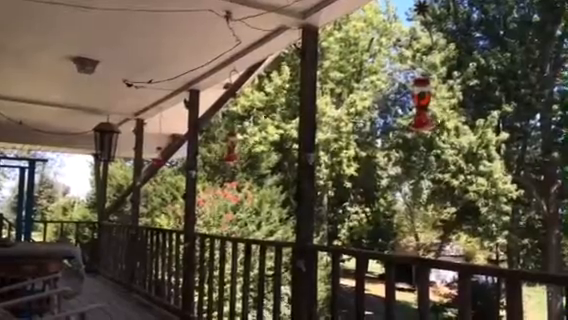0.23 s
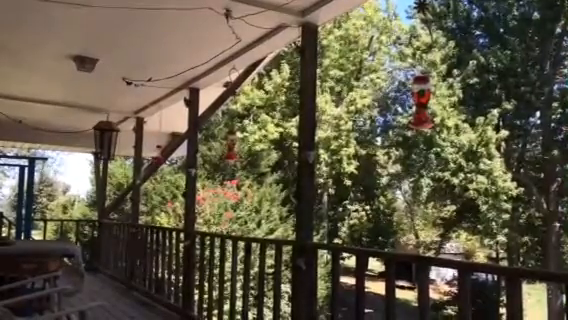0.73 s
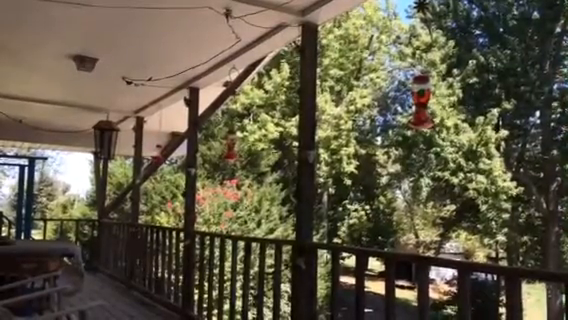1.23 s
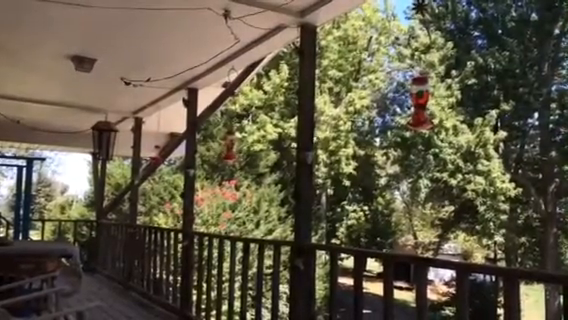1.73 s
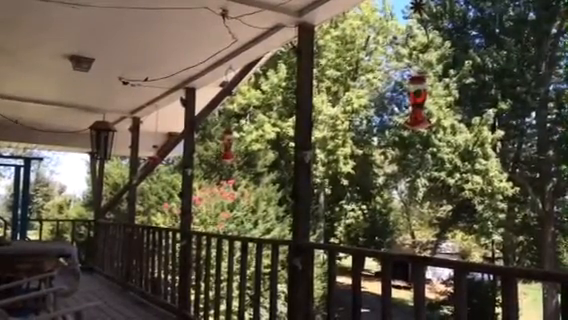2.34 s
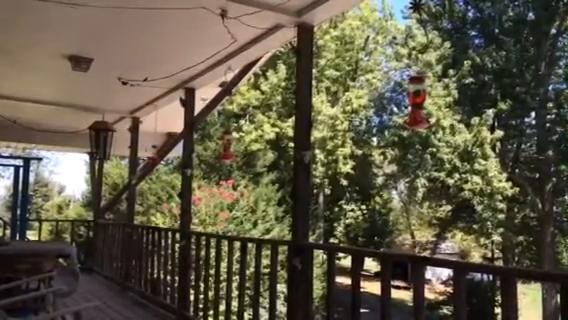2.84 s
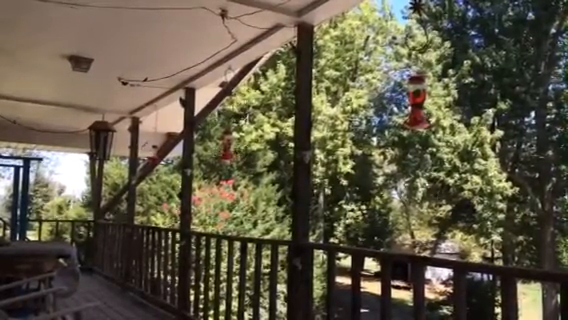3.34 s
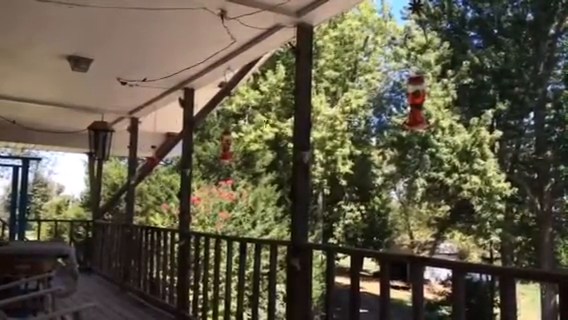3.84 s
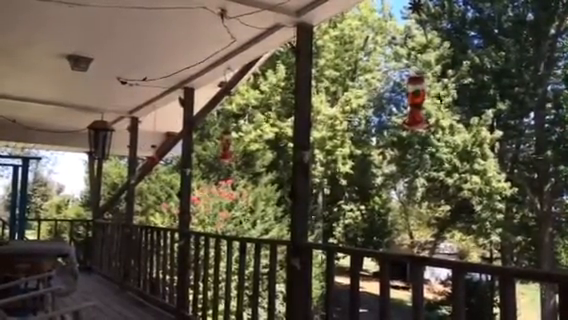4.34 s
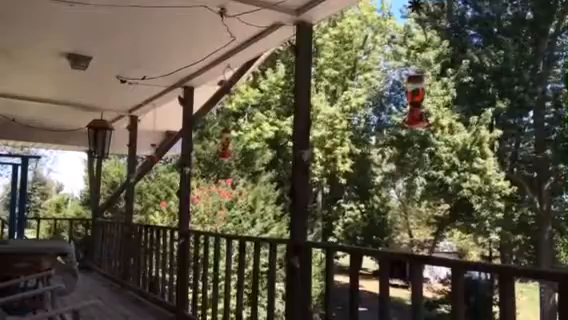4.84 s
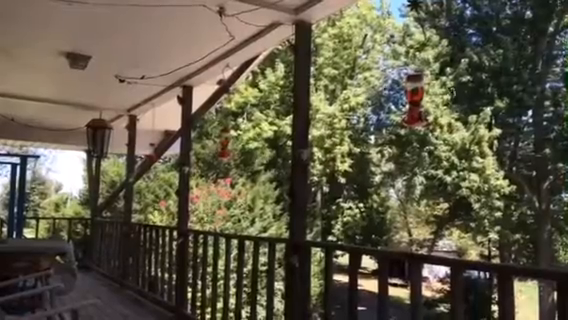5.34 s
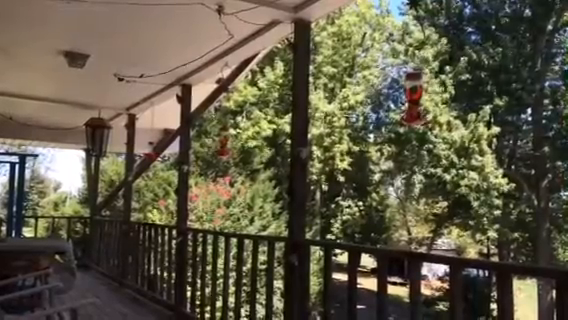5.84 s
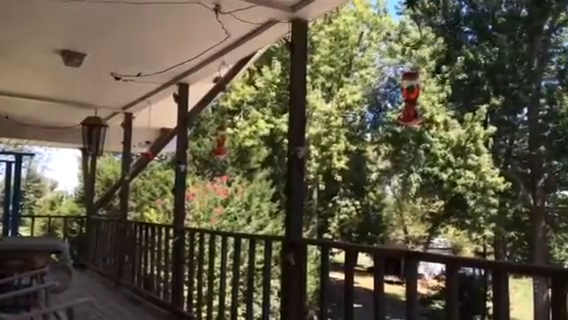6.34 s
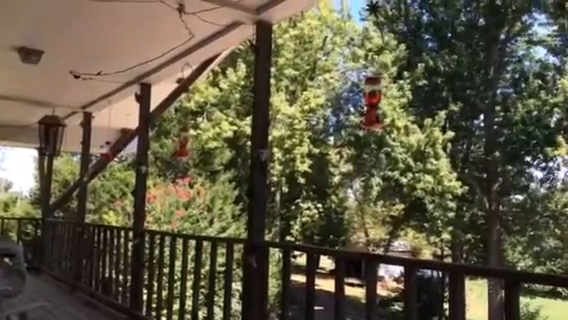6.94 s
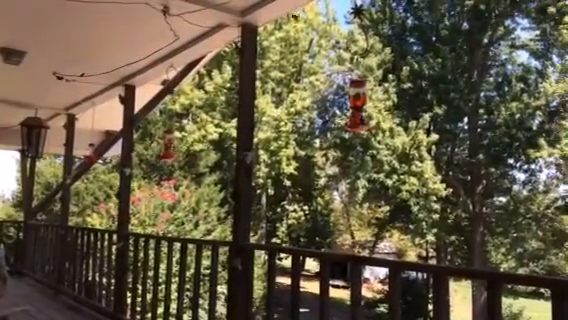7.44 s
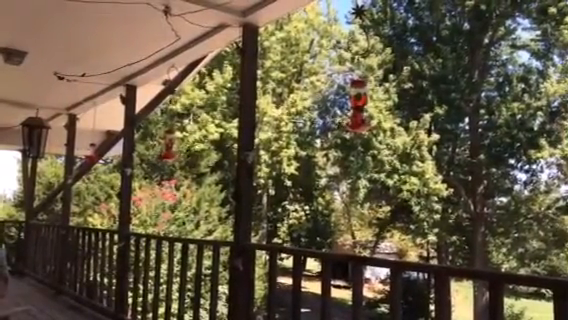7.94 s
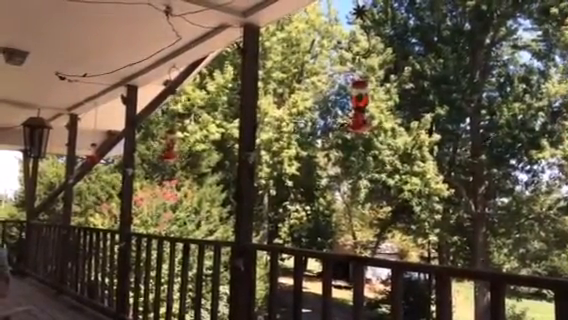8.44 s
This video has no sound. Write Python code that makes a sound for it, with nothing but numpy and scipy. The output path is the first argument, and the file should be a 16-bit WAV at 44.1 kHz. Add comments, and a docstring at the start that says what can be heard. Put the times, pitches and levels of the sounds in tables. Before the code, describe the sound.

Hummingbirds squabble around feeders on a wooden porch. Thin, high squeaks come first, mixed with soft rustles, quick runs of falling chips and short harsh buzzes. After a flurry past the middle comes a lull, then a squeak, several buzzes and a last run of chips. The nearby calls echo briefly under the roof, over a low hum of wings, a distant rumble, garden hiss and faint insects.

```python
"""Hummingbirds squabble round the feeders of a wooden porch, whose roof and deck echo each call.
Thin whistled squeaks open, loudest at 1.7 s, among soft rustles, runs of short falling chips and harsh
buzzes, with a flurry near 5 s. A lull from 5.5 s leaves faint far-off chips; at 7.2 s a squeak is
followed by five buzzes, a last run and a last squeak. Throughout: a low hum of wings, a far rumble,
far chips, the hiss of the garden and a faint high insect band."""
import sys
import numpy as np
from scipy import signal
from scipy.fft import rfft, irfft, next_fast_len
from scipy.io import wavfile

SR = 44100
rng = np.random.default_rng(int(sys.argv[2]) if len(sys.argv) > 2 else 0)


def store_pcm(level_fs):
    """Save levels as 16-bit WAV."""
    pcm = np.round(np.clip(level_fs, -1, 1) * 32767).astype(np.int16)
    wavfile.write(sys.argv[1], SR, np.atleast_2d(pcm).T)


N = 383229

# whistles: (time [s], length [s], first pitch [Hz], middle pitch [Hz], last pitch [Hz], level [dB],
# loudest point [0-1])
SQUEAK_CALLS = [ (.004, 0.11, 6900, 6690, 6960, -40.5, 0.13), (0.176, 0.086, 5470, 5385, 5580, -36.5, 0.37),
                (0.498, 0.079, 6990, 6850, 6800, -33, 0.12), (0.722, 0.084, 5730, 6160, 6290, -51.5, 0.9),
                (1.183, 0.085, 7350, 6800, 6600, -36.5, 0.3), (1.499, 0.17, 6590, 6270, 6580, -54.5, 0.18),
                (1.642, 0.034, 7000, 6990, 7020, -42, 0.7), (1.666, 0.054, 7130, 7154, 7190, -27, 0.25),
                (2.17, 0.077, 5700, 5600, 5830, -63, 0.3), (2.329, 0.1, 6960, 7070, 7000, -51, 0.35),
                (2.94, 0.088, 6400, 6160, 6150, -61, 0.44), (3.224, 0.092, 6780, 7120, 6730, -40, 0.9),
                (3.749, 0.12, 6780, 6730, 6800, -59.5, 0.15), (4.235, 0.1, 6290, 6620, 6730, -58.5, 0),
                (4.742, 0.083, 6340, 6330, 6600, -34.5, 0.12), (4.897, 0.066, 6400, 6510, 6250, -38, 0.45),
                (4.955, 0.11, 5540, 5800, 5720, -46.5, 0.3), (6.714, 0.054, 7460, 7230, 7180, -51.5, 0.4),
                (7.215, 0.067, 6000, 5400, 6020, -38.5, 0.5), (8.183, 0.12, 7290, 7250, 7200, -53.5, 0.15)]
# second harmonic of a squeak: (pitch [Hz], level re fundamental [dB])
SQUEAK_OCTAVE = [(5400, 0), (6350, -6), (6800, -13.5), (7200, -15.5)]
def squeaks(flutter_db=4.5):
    """Whistles bending through three pitches; low ones have a strong octave, soft ones waver more."""
    out, wobble, flutter = np.zeros((2, N)), walk(900), walk(130)
    for start_s, length_s, first_hz, middle_hz, last_hz, db, peak in SQUEAK_CALLS:
        u, at = span(start_s, length_s)
        knee_hz = middle_hz + .27 * (first_hz - middle_hz)
        hz = np.interp(u, [0, .2, .45, .85, 1], [first_hz, knee_hz, middle_hz, last_hz, last_hz])
        waver = np.interp(db, [-56, -44], [.022, .007])
        note = voice(hz * (1 + waver * wobble[at]), [0, lookup(middle_hz, SQUEAK_OCTAVE)])
        flutter_gain = undb(flutter_db * np.tanh(flutter[at]))
        add(out, start_s, note * swell(u, peak, power=.65) * flutter_gain, db)
    return out


# harsh calls: (time [s], length [s], top pitch [Hz], last dip [Hz], level [dB], overtone boost [dB])
BUZZ_CALLS = [ (0.315, 0.079, 5210, 1602, -46.5, 0), (2.35, 0.048, 2710, 1985, -59, 1),
              (3.376, 0.076, 6830, 5150, -53.5, -1), (3.599, 0.051, 3794, 2270, -57, 3),
              (4.054, 0.052, 6500, 4470, -52, 1.5), (4.904, 0.083, 6710, 2298, -47, 8),
              (5.087, 0.048, 3506, 1954, -49, 1), (7.274, 0.08, 5810, 1706, -50, 2.5),
              (7.436, 0.04, 3585, 1670, -49, -5), (7.528, 0.051, 3814, 1717, -47, -2.5),
              (7.622, 0.049, 3700, 1930, -50, -4), (7.695, 0.074, 5300, 2200, -49, 3.5)]
def buzzes(trill_hz=80, droop=.35, first_depth=.26):
    """The pitch plunges and recovers, deeper each time and roughest in the dips; a low chip ends it."""
    out, jitter, stumble = np.zeros((2, N)), walk(3500), walk(150)
    for start_s, length_s, top_hz, last_dip_hz, db, bright_db in BUZZ_CALLS:
        u, at = span(start_s, length_s)
        trill_rad = np.pi * trill_hz * u * length_s + .28 * stumble[at]
        plunge = (1 - np.abs(np.cos(trill_rad))) ** .6
        crest_hz = top_hz * (1 - droop * u ** 5)
        first_dip_hz = top_hz * (last_dip_hz / top_hz) ** first_depth
        dip_hz = first_dip_hz + (last_dip_hz - first_dip_hz) * u ** 1.3
        hz = crest_hz + (dip_hz - crest_hz) * plunge
        rough = .09 + .09 * plunge
        note = harsh_voice(hz * (1 + rough * jitter[at]), bright_db)
        add(out, start_s, note * swell(u, peak=.24, power=.65), db)
        chip(out, start_s + length_s - .017, pitch_hz=1950, db=db - 13, bright_db=-9, jitter=jitter)
    return out


# scolding runs: (time [s], chips [count], gap [s], last chip's delay [s], first pitch [Hz],
# last pitch [Hz], first level [dB], last level [dB], overtone boost [dB])
CHIP_RUNS = [ (.594, 4, 0.055, 0.032, 2010, 2215, -67.5, -66, -5),
             (1.248, 3, .068, 0.0049, 2080, 2084, -67, -67, 1.5),
             (1.785, 3, .0605, 0.0025, 2520, 2220, -55, -54.5, -2.5),
             (2.433, 8, 0.055, 0.098, 2197, 1940, -55.5, -60, 0.5),
             (3.665, 6, 0.05, 0.048, 2514, 2487, -60.5, -58, -3),
             (5.205, 3, .071, 0.0037, 2230, 2030, -47.5, -50, -2.5),
             (5.402, 3, .043, 0.00088, 2010, 1873, -63, -55, -7),
             (7.86, 4, .0575, 0.0024, 2890, 2843, -50.5, -51, -4)]
# single chips: (time [s], pitch [Hz], level [dB], overtone boost [dB])
LONE_CHIPS = [ (0.055, 2045, -55.5, -1), (.14, 1944, -63.5, 1), (1.155, 2080, -61, -7),
              (1.174, 2046, -54, -2), (2.057, 2180, -64, -0.5), (3.01, 2230, -64, -5),
              (4.102, 1954, -60, -4), (4.206, 2457, -58, -2.5), (6.272, 2090, -64, -16),
              (7.052, 1980, -65.5, -2)]
def chips():
    """Runs keep an even beat, slide in pitch and level and drag at the end; lone chips fall between."""
    out, jitter = np.zeros((2, N)), walk(2500)
    for start_s, count, gap_s, drag_s, first_hz, last_hz, first_db, last_db, bright_db in CHIP_RUNS:
        for k, u in enumerate(np.linspace(0, 1, round(count))):
            pitch_hz = first_hz + (last_hz - first_hz) * u
            db = first_db + (last_db - first_db) * u
            chip(out, start_s + k * gap_s + drag_s * u ** 5, pitch_hz, db, bright_db, jitter)
    for start_s, pitch_hz, db, bright_db in LONE_CHIPS:
        chip(out, start_s, pitch_hz, db, bright_db, jitter)
    return out


def chip(out, start_s, pitch_hz, db, bright_db, jitter, length_s=.019):
    """A quick note that drops and breaks up; high ones hold longer and drop less, soft ones rasp."""
    u, at = span(start_s, length_s)
    rough = np.interp(db, [-54, -48], [.055, .012]) + .08 * u ** 2
    hold = np.interp(pitch_hz, [2200, 2900], [1.3, 3.2])
    drop = .418 * np.interp(pitch_hz, [2250, 2550], [1, .6])
    hz = pitch_hz * (1 + drop * (1 / (1 + hold) - u ** hold))
    note = harsh_voice(hz * (1 + rough * jitter[at]), bright_db)
    add(out, start_s, note * swell(u, peak=.6, power=.45), db)


# harmonics 2-5 at the source: (relative level [dB])
HARSH_OVERTONES_DB = [0.014, 0.5, -1.7, 0.5]
# throat and bill response: (frequency [Hz], gain [dB])
THROAT_RESPONSE = [(1500, 3.5), (2500, 0), (4000, -1.5), (5500, 1), (7500, 8), (9500, -2), (11000, -0.5),
                   (12500, -12.5), (15000, -17)]
def harsh_voice(hz, bright_db):
    """Five harmonics coloured by throat and bill."""
    return voice(hz, [0, *(bright_db + np.array(HARSH_OVERTONES_DB))], THROAT_RESPONSE)


# faint distant chips (6.0-6.7 s) and soft rustles: (time [s], length [s], centre [Hz], level [dB])
FAINT_BURSTS = [(0.006, 0.22, 1880, -67), (0.238, 0.036, 1540, -60), (0.577, 0.0078, 7150, -49),
                (0.904, 0.064, 1890, -64.5), (1.556, 0.15, 1790, -70), (4.353, 0.11, 1750, -69),
                (6.047, 0.049, 1900, -63), (6.163, 0.056, 1970, -68), (6.496, 0.04, 2030, -65),
                (6.599, 0.026, 1950, -63.5), (6.7, 0.056, 2000, -67.5), (8.432, 0.055, 1680, -64)]
def faint_chips_and_rustles(q=2.04):
    """Distant chips and soft rustles, each a noise burst in one broad resonance."""
    out = np.zeros((2, N))
    grains = unit(rng.standard_normal(N) * undb(2.4 * walk(370)))
    for start_s, length_s, centre_hz, db in FAINT_BURSTS:
        u, at = span(start_s, length_s)
        burst = signal.lfilter(*signal.iirpeak(centre_hz, q, fs=SR), grains[at])
        add(out, start_s, unit(burst) * swell(u, peak=.14, power=.19), db)
    return out


def porch(calls, early_s=.018, bright_t60_s=.32, dull_t60_s=.33):
    """Roof, posts and deck return quick echoes; house and trees add a short tail, fuller in the lows."""
    direct, sent = calls
    t = np.arange(SR // 2) / SR
    bright, dull = rng.standard_normal((2, len(t))) * (1 - np.exp(-t / .012))
    bright = unit(bright * undb(-60 * t / bright_t60_s))
    dull = unit(dull * undb(-60 * t / dull_t60_s))
    dull = signal.sosfilt(signal.butter(2, 3000, fs=SR, output="sos"), dull)
    early = np.zeros(len(t))
    lags_s = rng.uniform(.1, 1, size=24) * early_s
    early[(lags_s * SR).astype(int)] = np.exp(-lags_s / early_s) * rng.choice([-1, 1], size=24)
    echoes = undb(2) * unit(early) + undb(-6) * bright + undb(-2.5) * dull
    return direct + signal.fftconvolve(sent, echoes / np.sqrt(len(t)))[:N]


# hovering birds: (wingbeat [Hz], relative level [dB])
HOVERING_BIRDS = [(47.97, -2.5), (44.95, 5.5), (52.75, 1)]
# wingbeat harmonics 1-8: (relative level [dB])
WINGBEAT_HARMONICS_DB = [-19, -13, -6.5, 6, -8, -16.5, -33, -15]
# hum as birds come and go: (time [s], relative level [dB])
WING_ENVELOPE = [(0.0, -60), (0.16, -55.5), (0.68, -63.5), (0.92, -56), (1.44, -63.5), (1.52, -60),
                 (2.56, -66.5), (2.84, -53.5), (4.88, -61), (5.48, -54.5), (7.48, -55), (7.84, -59),
                 (8.08, -50.5), (8.2, -61), (8.4, -61.5), (8.6, -53), (8.68, -65)]
def wing_hum(gain_db=1, dart_db=2.5, flutter_db=2.5):
    """Wingbeats drift in rate, flutter and fade as the birds dart about."""
    wings = 0
    for hz, db in HOVERING_BIRDS:
        beat_hz = hz * (1 + .036 * walk(5) + .03034 * walk(40))
        bird_db = db + dart_db * walk(7.2) + flutter_db * walk(25)
        wings = wings + voice(beat_hz, WINGBEAT_HARMONICS_DB) * undb(bird_db)
    return unit(wings) * undb(lookup(np.arange(N) / SR, WING_ENVELOPE) + gain_db)


# far rumble: (frequency [Hz], relative density [dB])
RUMBLE_SPECTRUM = [(20, -20), (40, -6), (68, -7), (100, 3), (135, -4.5), (185, -8.5), (250, -12),
                   (400, -13), (700, -24.5), (1400, -35.5), (4000, -34)]
# its rise and fall: (time [s], relative level [dB])
RUMBLE_ENVELOPE = [(0.0, -50.5), (0.24, -58), (0.92, -59), (1.28, -63), (1.68, -59.5), (3.16, -58.5),
                   (3.24, -56), (4.2, -58.5), (4.36, -55.5), (4.68, -60.5), (5.28, -56.5), (5.44, -61),
                   (6.2, -54), (6.36, -60), (6.48, -55.5), (8.24, -57), (8.68, -53)]
def far_rumble(gain_db=1, surge_db=1.5):
    """Low surging noise, strongest near 100 Hz."""
    db = lookup(np.arange(N) / SR, RUMBLE_ENVELOPE) + gain_db + surge_db * walk(20)
    return undb(db) * noise(RUMBLE_SPECTRUM)


def far_chips(count=40, centre_hz=1750, spread=.161, level_db=-70, bright_db=-4):
    """Birds back in the trees chip faintly at random throughout."""
    out, jitter = np.zeros((2, N)), walk(2500)
    for k, (shift, detune, loudness) in enumerate(rng.uniform(-1, 1, (count, 3))):
        start_s = (k + (1 + shift) / 2) / count * N / SR
        chip(out, start_s, centre_hz * (1 + spread * detune), level_db + 2 * loudness, bright_db, jitter)
    return out


# garden hiss: (frequency [Hz], relative density [dB])
GARDEN_SPECTRUM = [(300, -9), (900, -3.5), (1600, -4.5), (2800, -7), (4200, -.5), (6000, 1), (8000, 1),
                   (9000, -3.7), (11500, -3.5), (15000, 0), (18000, -20)]
def garden_hiss(level_db=-61.5, breeze_db=.35):
    """Smooth wide noise, swaying slightly with the breeze."""
    return undb(level_db + breeze_db * walk(2)) * noise(GARDEN_SPECTRUM)


# insect band: (frequency [Hz], relative density [dB])
INSECT_SPECTRUM = [(5000, -32), (7300, -19.5), (7950, -2.5), (8280, -6), (8700, -41), (11000, -62)]
def insects(level_db=-68):
    """Far insects shrill in one flickering band near 8 kHz."""
    return noise(INSECT_SPECTRUM) * undb(level_db + walk(23))


def voice(hz, harmonics_db, response=((1, 0), (2, 0))):
    """Harmonics on a moving pitch, shaped by a (Hz, dB) response and faded at the top of hearing."""
    phase = 2 * np.pi * np.cumsum(hz) / SR
    out = 0
    for k, db in enumerate(harmonics_db, 1):
        audible = np.clip((18900 - k * hz) / 1000, 0, 1)
        out = out + undb(db + lookup(k * hz, response)) * audible * np.sin(k * phase)
    return out


def add(track, start_s, sound, db):
    """Mix into row 0 (direct) and row 1 (echo send); faint calls are further off and wetter."""
    i = max(int(start_s * SR), 0)
    send = np.interp(db, [-56, -48], [.82, .38])
    track[:, i:i + len(sound)] += np.outer([np.sqrt(1 - send ** 2), send], undb(db) * sound[:N - i])


def noise(spectrum):
    """Noise of rms 1 shaped by (Hz, dB) points."""
    hz, db = np.transpose(spectrum)
    size = next_fast_len(N, real=True)
    bins_hz = np.fft.rfftfreq(size, 1 / SR) + 1
    gain = undb(np.interp(np.log(bins_hz), np.log(hz), db))
    return unit(irfft(rfft(rng.standard_normal(size)) * gain, size)[:N])


def walk(rate_hz):
    """Random values joined by straight lines, rms near 1."""
    steps = np.arange(N) * rate_hz / SR
    return np.interp(steps, np.arange(N // 4), rng.standard_normal(N // 4)) * np.sqrt(3 / 2)


def span(start_s, length_s):
    """Progress u (0-1) through a call, and its sample indices."""
    count = max(int(length_s * SR), 16)
    return np.linspace(0, 1, count), (int(start_s * SR) + np.arange(count)) % N


def swell(u, peak, power):
    """Envelope that rises to a peak and falls away."""
    skewed = np.interp(u, [0, np.clip(peak, .05, .95), 1], [0, .5, 1])
    return np.sin(np.pi * skewed).clip(0) ** power


def lookup(x, points):
    """Interpolate a two-column table."""
    return np.interp(x, *np.transpose(points))


def undb(db):
    """Decibels to gain."""
    return 10 ** (np.asarray(db) / 20)


def unit(x):
    """Scale to rms 1."""
    return x / np.sqrt(np.mean(x ** 2) + 1e-18)


def scene():
    """Birds and rustles echo under the porch roof, over the steady outdoors."""
    calls = squeaks() + buzzes() + chips() + far_chips() + faint_chips_and_rustles()
    return (porch(calls) + wing_hum() + far_rumble() + garden_hiss() + insects())[None]


def record(dry):
    """Steep low-pass at 15.4 kHz."""
    return signal.sosfilt(signal.ellip(10, .2, 70, 15400, fs=SR, output="sos"), dry)


dry = scene()
out = record(dry)
store_pcm(out)
```